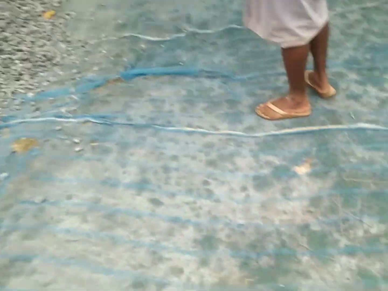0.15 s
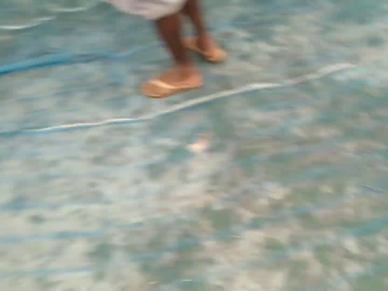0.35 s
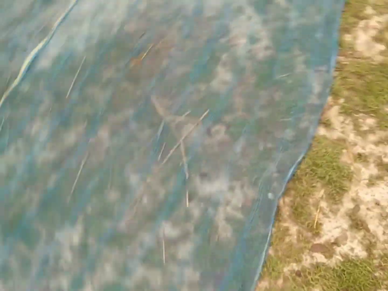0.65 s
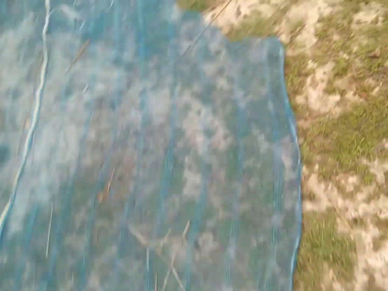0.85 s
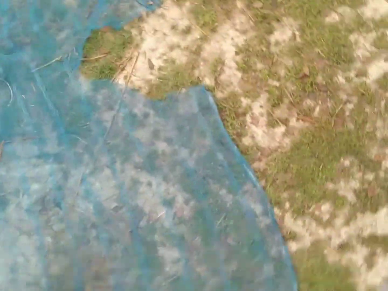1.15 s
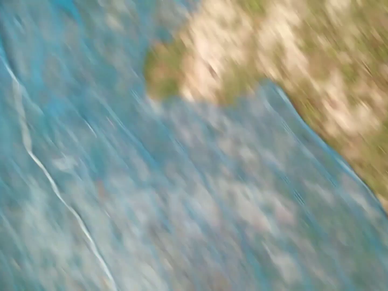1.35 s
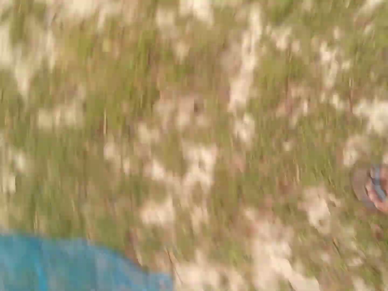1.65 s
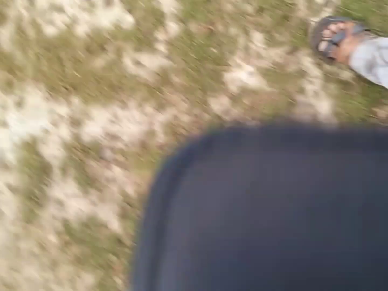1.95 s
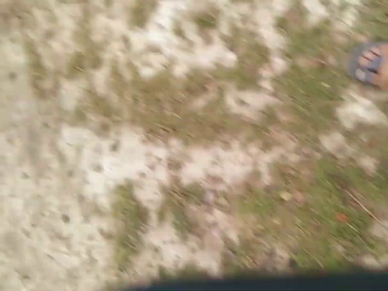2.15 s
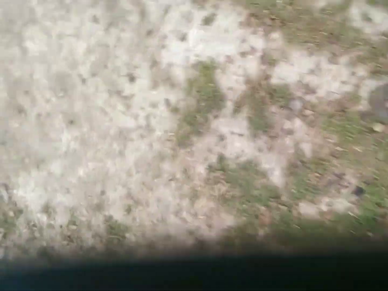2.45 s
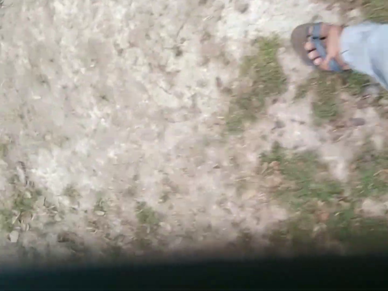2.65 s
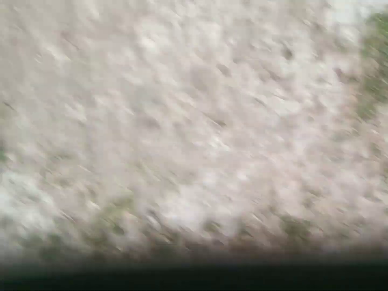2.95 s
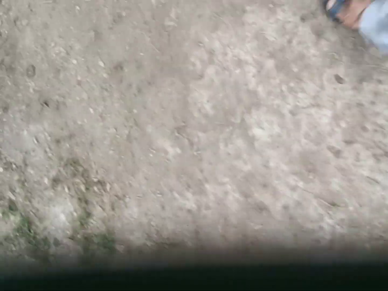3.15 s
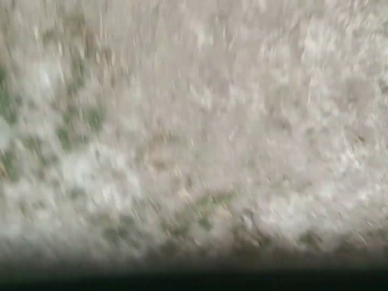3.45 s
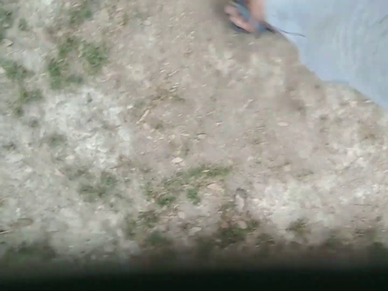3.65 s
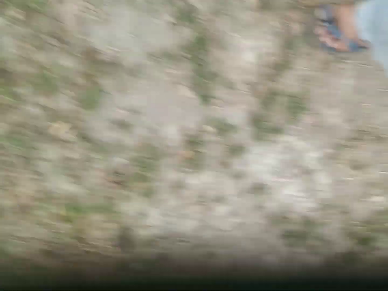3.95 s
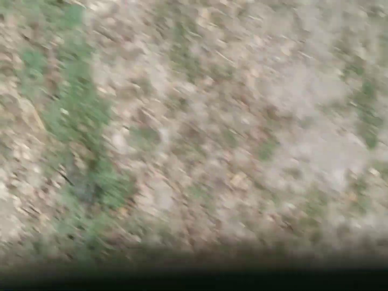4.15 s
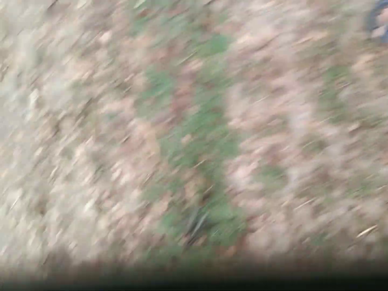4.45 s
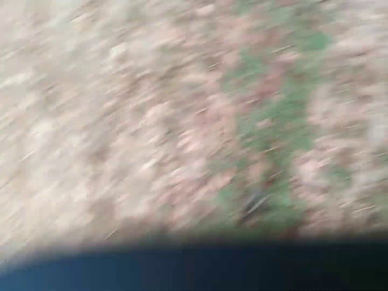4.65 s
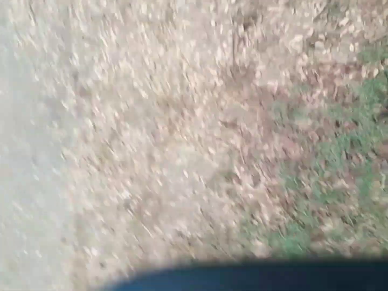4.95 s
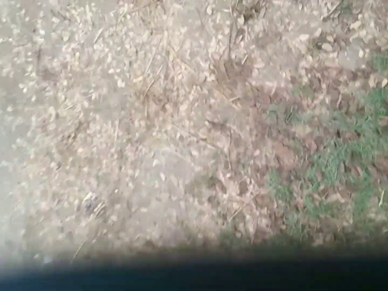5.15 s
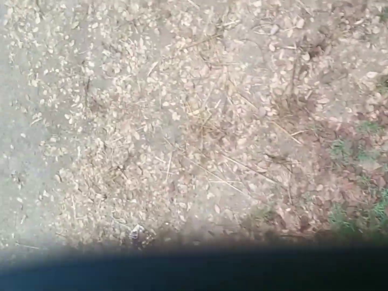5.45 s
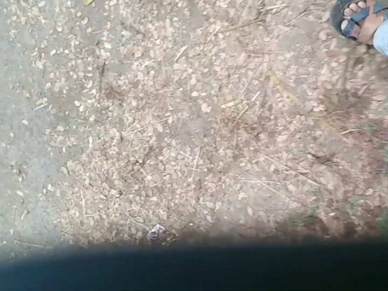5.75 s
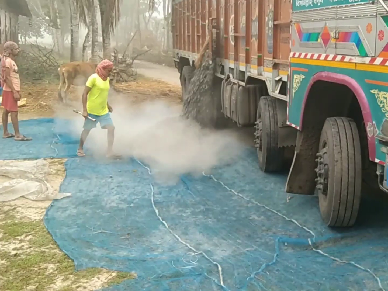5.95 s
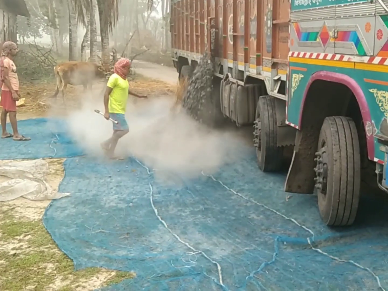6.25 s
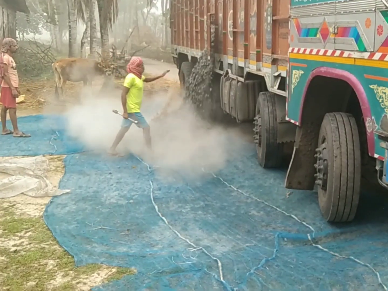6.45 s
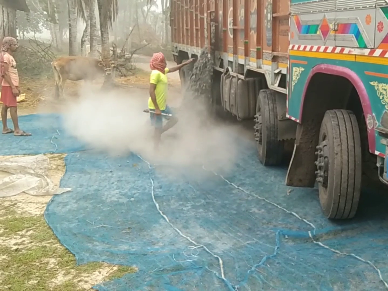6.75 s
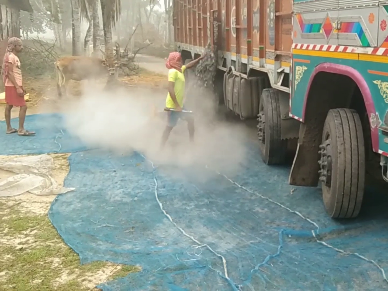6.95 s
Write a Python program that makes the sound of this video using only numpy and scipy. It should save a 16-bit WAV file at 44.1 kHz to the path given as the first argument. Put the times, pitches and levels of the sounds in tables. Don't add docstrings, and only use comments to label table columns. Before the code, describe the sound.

A continuous stony rattle, bright at first, then muffled by the hand and body around a single phone microphone as it is walked past. Sharp ticks, dull knocks, grit crunches, low wind and faint metal creaks overlap it. The rattle brightens again, cuts to a blink of silence, then returns quickly as an even midrange pour with a few knocks and tiny squeaks.

```python
import sys
import numpy as np
from scipy import signal
from scipy.fft import rfft, irfft
from scipy.io import wavfile
from scipy.ndimage import uniform_filter1d, map_coordinates

SR = 44100
rng = np.random.default_rng(int(sys.argv[2]) if len(sys.argv) > 2 else 0)


def natural_amplitude(level_db):
    exponent = np.asarray(level_db, float) / 20
    return 10 ** exponent


def inscribe(sig):
    pcm = np.round(np.clip(np.atleast_2d(sig).T, -1, 1) * 32767)
    wavfile.write(sys.argv[1], SR, pcm.astype(np.int16))


N = 313551
CUT_S, BACK_S = 5.774, 5.856
TOP_HZ = 15520


def unit(x):
    return x / np.sqrt(np.mean(np.abs(x) ** 2) + 1e-20)


def along(points, hz):
    point_hz, value = np.transpose(points)
    return np.interp(np.log(hz + 1), np.log(point_hz + 1), value)


def curves(rows, t):
    start_s, *columns = np.transpose(rows)
    return [np.interp(t, start_s, column) for column in columns]


def wobble(rate, t):
    knots = rng.standard_normal(int(t[-1] * rate) + 4)
    return map_coordinates(knots, [t * rate])


def peak(f, centre_hz, width_hz, boost_db):
    return boost_db / (1 + (2 * (f - centre_hz) / width_hz) ** 2)


def grains(s, hz, life, size, count=96):
    t = np.arange(count) / SR
    age = t / life[:, None]
    shape = size[:, None] * np.sin(2 * np.pi * hz[:, None] * t) * age * np.exp(1 - age)
    at = (s * SR).astype(int)[:, None] + np.arange(count)
    return np.bincount(at.ravel(), shape.ravel(), N + count)[:N]


def burst(s, db, hz, span, spread, count):
    draw = rng.random((count, 3))
    late = span * draw[:, 0] ** 1.5 * (np.arange(count) > 0)
    pitch_hz = hz * np.exp(spread * (2 * draw[:, 1] - 1))
    return s + late, pitch_hz, natural_amplitude(db - 9 * late / span - 1.9 * draw[:, 2])


def bursts(events, trim_db, span, spread, count):
    return np.hstack([burst(s, db + trim_db, hz, span, spread, count) for s, db, hz in events])


def stream(count=40000):
    t = np.arange(N) / SR
    clumps = natural_amplitude(0.22 * wobble(150, t) + 0.94 * wobble(45, t) + 0.53 * wobble(18, t))
    when, pitch, weight = rng.random((count, 3)).T
    hz = 1500 + 13500 * pitch
    size = natural_amplitude(2.3 * weight ** 3) * np.sqrt(hz)
    clicks = unit(grains(when * t[-1], hz, 0.5 / hz, size, count=64))
    return clumps * (clicks + natural_amplitude(5.5) * rng.standard_normal(N))


def carrier_db(f, t):
    # start_s [s], pitch_hz [Hz], boost_db [dB]
    cup = [(0, 577, -14), (.45, 706, -8), (.6, 660, 3), (2.2, 790, 5), (3.6, 1130, 6.5), (3.85, 1300, 3),
           (3.93, 670, 3), (4.1, 696, 13), (4.19, 770, 17), (4.27, 840, 2), (4.5, 800, 8), (4.9, 795, -1),
           (5.05, 604, 4), (5.2, 740, 4.5), (5.77, 790, 7)]
    # start_s [s], pitch_hz [Hz], boost_db [dB]
    case_edge = [(0, 6700, -8.5), (.6, 5840, -5), (.7, 4570, 1), (.92, 4630, 8.5), (1.08, 4400, 7.5),
                 (1.24, 3630, 6), (1.33, 2200, 0), (1.5, 2300, -5), (1.75, 2230, -18), (2.1, 2100, -11),
                 (2.25, 1600, 1), (2.6, 2500, -1), (4.0, 2300, 0.5), (4.5, 2510, -2), (4.68, 3320, -1.5),
                 (4.95, 3500, -6), (5.1, 2070, -0.5), (5.77, 2160, -14)]
    # start_s [s], pitch_hz [Hz], boost_db [dB]
    body = [(0, 7000, -.1), (.62, 7060, -.1), (.72, 6900, -11), (.9, 6500, -4), (.95, 3400, -.1),
            (1.08, 2740, -12), (1.27, 2500, -9), (1.38, 2220, -10), (1.5, 2670, -8), (1.75, 3080, -8),
            (1.93, 3180, -9), (2.05, 3100, -10), (2.2, 3500, -.1), (4.95, 3470, -1), (5.12, 3780, -3),
            (5.35, 4400, -6), (5.5, 4560, -7), (5.77, 4680, -9)]
    cup_hz, cup_db = curves(cup, t)
    edge_hz, edge_db = curves(case_edge, t)
    body_hz, body_db = curves(body, t)
    cup_width_hz = 298 * natural_amplitude(-0.59 * cup_db)
    hand_db = peak(f, cup_hz, cup_width_hz, cup_db) + peak(f, edge_hz, edge_hz / 3.5, edge_db)
    return hand_db + peak(f, body_hz, body_hz / 11, body_db)


def close_echo(f, t, walking):
    # start_s [s], notch_spacing_hz [Hz], strength [0-1]
    hand_echo = [(0, 2320, 0), (.48, 2220, 0), (.7, 3570, 0.2), (.92, 3580, 0.3), (1.08, 2800, 0.28),
                 (1.27, 2380, 0.33), (1.38, 2200, 0.1), (1.5, 2740, 0.18), (1.65, 3200, 0.03),
                 (1.95, 3150, 0.1), (2.2, 4230, 0.02), (3.0, 2130, 0.14), (3.9, 2170, 0.17),
                 (4.3, 1990, 0.05), (4.95, 1750, 0.04), (5.25, 2200, 0.46), (5.45, 2420, 0.3),
                 (5.77, 2400, 0.02)]
    # notch_spacing_hz [Hz], strength [0-1]
    ground_echo = (1450, 0.074)
    spacing_hz, strength = np.where(walking, curves(hand_echo, t), np.c_[list(ground_echo)])
    first_notch_db = peak(f, spacing_hz, 450, -6 * strength)
    strength = np.clip(strength, 0, .95) / (1 + (f / 12000) ** 3)
    return natural_amplitude(first_notch_db) * np.abs(1 - strength * np.exp(2j * np.pi * f / spacing_hz))


def view_levels(t, walking):
    # start_s [s], rumble bending round the carrier level_db [dB], lift of the open view lift_db [dB]
    carry = [(0, -39.5, 22), (.5, -41.5, 21.5), (.65, -36, 15), (.9, -36.5, 16.5), (1.33, -36.5, 6),
             (1.56, -37, 6), (2.05, -33.5, -2.5), (2.3, -35, 10), (2.75, -38.5, 13.5), (2.97, -44, 16),
             (3.45, -42.5, 3), (3.99, -39.5, -3), (4.43, -41, 2), (4.56, -33, 2), (4.8, -36.5, 4.5),
             (4.92, -37.5, 14), (5.2, -34, 10.5), (5.76, -44, 10.5)]
    # start_s [s], lift_db [dB], length_s [s]
    jerks = [(1.106, 1, 0.15), (1.533, 3, 0.21), (2.4, -1, .08), (2.85, -4.5, 0.16), (3.77, 4.5, 0.68),
             (4.28, 6, 0.022), (4.55, 8.5, 0.025), (4.592, 5.5, 0.018), (4.672, 8.5, 0.012),
             (4.73, -2.5, 0.071), (4.91, 4.5, 0.045), (5.065, 2.5, 0.28), (5.346, -1.5, 0.098),
             (5.417, 3.5, 0.09), (5.6, -0.5, 0.064)]
    view_share = [0, .3, 1, 1.15]
    shaded_db = [-0.5, 1, 1, -19]
    stand_db = [-37.5, -32.5, -17, -31.5]
    # start_s [s], level_db [dB]
    cover = [
        (0, 0.5),
        (1.0, 2),
        (1.5, 0),
        (3.5, 1),
        (3.84, 1),
        (3.95, -2.5),
        (4.45, 0),
        (4.55, -7.5),
        (4.8, 5),
        (5.76, 2.5),
    ]
    level_db, view_db = curves(carry, t)
    for s, db, length_s in jerks:
        view_db = view_db + db * np.exp(-(2 * (t - s) / length_s) ** 2)
    walk_db = level_db + np.c_[shaded_db] + np.c_[view_share] * view_db
    heard_db = np.where(walking, walk_db, np.c_[stand_db])
    heard_db[-1] += walking * curves(cover, t)[0]
    return heard_db


def pour():
    # pitch_hz [Hz], level_db [dB per Hz]
    walk_tone = [(88, -53), (150, -37), (263, -7), (472, -5.5), (797, -8.5), (1430, -9), (3420, -5),
                 (5040, 0.5), (7580, 5.5), (8520, 1), (13100, -17.5), (14700, -18.5), (15600, -20)]
    # pitch_hz [Hz], level_db [dB per Hz]
    stand_tone = [(120, -47), (200, -19), (345, -13.5), (770, -15), (1110, -22), (2140, -16), (3250, -11.5),
                  (3800, -10), (5200, -17.5), (6600, -12), (8500, -19), (10300, -24), (12000, -32),
                  (15600, -33)]
    # pitch_hz [Hz], width_hz [Hz], boost_db [dB]
    stand_dips = [
        (530, 240, -16.5),
        (3340, 880, -8.5),
    ]
    edges_hz = [250, 1200, 3500, 9500, 15500]
    hz, t, z = signal.stft(stream(), SR, nperseg=512, noverlap=384)
    usual = np.sqrt(np.mean(np.abs(z) ** 2, axis=1))
    z = z / uniform_filter1d(usual, size=9)[:, None]
    f = hz[:, None]
    walking = t < (CUT_S + BACK_S) / 2
    walk_db = along(walk_tone, f) + carrier_db(f, t)
    stand_db = along(stand_tone, f) + sum(peak(f, *dip) for dip in stand_dips)
    colour = natural_amplitude(np.where(walking, walk_db, stand_db)) * close_echo(f, t, walking)
    shade_db = []
    for lo, hi, db in zip(edges_hz, edges_hz[1:], view_levels(t, walking)):
        band_power = np.sum(colour[(hz >= lo) & (hz < hi)] ** 2, axis=0)
        shade_db.append(db - 10 * np.log10(band_power))
    centres = np.log([600, 2100, 6000, 11500])
    blend = np.array([np.interp(np.log(hz + 1), centres, row) for row in np.eye(4)])
    patches = uniform_filter1d(rng.standard_normal(z.shape), size=7, axis=0)
    patches = uniform_filter1d(patches, size=14, axis=1)
    streaks = uniform_filter1d(rng.standard_normal(z.shape), size=40, axis=1)
    uneven_db = 0.5 * unit(patches) + 1.9 * unit(streaks) / (1 + (f / 6000) ** 2)
    z = z * colour * natural_amplitude(blend.T @ shade_db + uneven_db - 2.0)
    return signal.istft(z, SR, nperseg=512, noverlap=384)[1][:N]


def buffet():
    # start_s [s], level_db [dB]
    gusts = [(0, -56), (.43, -56), (.58, -51), (1.14, -48), (1.49, -50), (1.7, -42.5), (2.23, -44.5),
             (2.58, -52), (3.96, -53.5), (4.5, -43.5), (5.17, -48.5), (5.75, -57.5), (7.1, -51)]
    # pitch_hz [Hz], level_db [dB per Hz]
    wind_tone = [(15, -38), (25, -22.5), (81, -2), (188, -0.5), (236, -5), (265, -12), (300, -17),
                 (390, -77), (660, -120)]
    t = np.arange(N) / SR
    hz = np.fft.rfftfreq(N, 1 / SR)
    noise = irfft(rfft(rng.standard_normal(N)) * natural_amplitude(along(wind_tone, hz)), N)
    return natural_amplitude(curves(gusts, t)[0]) * unit(noise * natural_amplitude(0.55 * wobble(11, t)))


def slides():
    # start_s [s], peak level_db [dB], pitch_hz [Hz],
    # length_s [s]
    runs = [(2.461, -24.5, 1740, 0.14), (0.019, -29.5, 1110, 0.16), (2.495, -19.5, 3100, .3),
            (2.651, -25, 1540, 0.24), (3.751, -29, 1470, 0.31), (4.315, -33, 596, 0.015),
            (4.316, -34, 1050, 0.0097), (4.322, -30, 1780, 0.023), (4.327, -32, 532, .024),
            (4.325, -33, 1400, 0.037), (4.341, -36, 856, 0.054), (4.341, -39, 425, 0.053),
            (4.472, -23, 2130, 0.047), (4.532, -28, 2580, 0.11), (5.062, -10.5, 5440, 0.12),
            (5.075, -29, 700, 0.17), (5.1, -19, 3000, 0.26)]
    out = np.zeros(N)
    for s, db, hz, length_s in runs:
        when, pitch, weight = rng.random((200, 3)).T
        pitch_hz = hz * np.exp(.2 * (2 * pitch - 1))
        size = natural_amplitude(db - 8.5 - 13.3 * weight) * np.sqrt(np.sin(np.pi * when))
        out += grains(s + length_s * when, pitch_hz, 2.2 / pitch_hz, size, count=640)
    return out


def near_chips():
    # start_s [s], peak level_db [dB], pitch_hz [Hz]
    chips = [(0.2484, -2, 8050), (0.3596, -6, 7720), (0.3874, -3, 8040), (.3915, -4, 7300),
             (0.417, -5, 7400), (0.4913, -7, 7750), (0.5887, -5, 7900), (0.6929, -7, 8060),
             (0.7227, -4, 8600), (.7302, -11, 8600), (0.748, -7, 6550), (0.79, -12, 4900),
             (0.8046, -8, 5270), (0.8181, -9, 6100), (0.8296, -0.5, 8700), (.8334, -4, 5000),
             (.8422, -13, 5130), (0.9176, -4.5, 8100), (0.991, -10, 4880), (1.3739, -26, 7100),
             (1.573, -16, 7500), (1.8381, -19, 7700), (1.9371, -19, 7500), (2.2012, -20, 4960),
             (2.5494, -21, 7470), (3.0547, -17, 7400), (3.6081, -25, 5200), (3.7649, -20, 7000),
             (3.7993, -28, 5400), (3.879, -23, 7700), (4.0505, -26, 6500), (4.0981, -23, 6100),
             (4.1252, -31, 4100), (4.2383, -21, 6900), (4.262, -24, 6800), (4.2747, -27, 7300),
             (4.4022, -18, 7540), (4.4639, -27, 4600), (4.48, -19.5, 4570), (4.7037, -21, 7000),
             (4.8634, -10, 7500), (4.9, -7, 7500), (4.907, -4, 6500), (4.913, -8, 6500), (4.9664, -8, 8000),
             (5.014, -7, 7100), (5.029, -7.5, 5400), (5.044, 0, 6300), (5.1074, -11, 6700),
             (5.1287, -10, 7160), (5.4305, -11, 6340), (5.5368, -17, 5700), (6.105, -9, 6810),
             (6.19, -3, 6600), (6.289, -12, 6410), (6.342, -8, 6600)]
    s, hz, size = bursts(chips, -3.0, span=0.0016, spread=0.2, count=3)
    return grains(s, hz, 2.1 / hz, size, count=128)


def bumps():
    # start_s [s], peak level_db [dB], pitch_hz [Hz]
    jolts = [(0.505, -37, 107), (1.049, -41, 97), (1.095, -39, 78), (1.137, -32, 86), (1.175, -36, 89),
             (1.44, -36.5, 95), (1.62, -32, 113), (1.662, -27, 126), (1.7, -34, 98), (1.27, -44, 55),
             (1.64, -31, 58), (3.69, -44, 60), (1.959, -31, 123), (2.265, -37, 66), (2.399, -41, 81),
             (2.559, -39, 102), (2.867, -28, 89), (2.896, -20.5, 106), (2.937, -37, 94), (3.96, -38, 90),
             (4.279, -34, 117), (5.12, -38, 110)]
    settle_s = 0.036
    t, out = np.arange(SR // 5) / SR, np.zeros(N)
    swell = np.exp(-((t - settle_s / 2) / settle_s * 3) ** 2)
    for s, db, hz in jolts:
        turns = hz * t * (1.3 - .3 * np.minimum(t / settle_s, 1))
        out[round(s * SR):][:len(t)] += natural_amplitude(db) * np.sin(2 * np.pi * turns) * swell
    return out


def knocks():
    # start_s [s], peak level_db [dB], pitch_hz [Hz]
    blows = [(.577, -19.5, 2400), (.648, -18.5, 1750), (0.755, -21.5, 1650), (1.476, -26, 970),
             (1.67, -25, 190), (1.97, -25, 200), (2.901, -28.5, 189), (1.838, -29, 1440), (1.954, -27, 930),
             (2.472, -27, 1600), (2.515, -35, 1650), (2.543, -24, 1510), (3.003, -29, 2300),
             (4.096, -29, 1260), (4.27, -29, 2720), (4.319, -19.5, 1210), (0.967, -25, 1790),
             (1.095, -29, 1990), (2.953, -31, 1400), (3.015, -32, 830), (3.127, -37, 1200),
             (3.252, -38, 1900), (3.425, -29.5, 1910), (4.494, -26, 1990), (4.418, -30, 1220),
             (4.594, -24, 1060), (5.042, -24, 670), (5.089, -22.5, 493), (5.488, -26, 720),
             (6.37, -24, 2120), (6.701, -22, 2180), (6.862, -27, 2180)]
    s, hz, size = bursts(blows, -10.5, span=.03, spread=0.5, count=40)
    return grains(s, hz, 1.22 / hz, size * np.sqrt(hz / 900), count=768)


def finger_squeaks():
    # start_s [s], peak level_db [dB], pitch_hz [Hz]
    slips = [(.765, -28, 14300), (.7695, -24, 14100), (.785, -26, 14600), (.804, -27, 14300),
             (.815, -30, 14300), (.822, -15, 14400), (.8317, -26, 14500), (1.023, -31, 15000),
             (1.043, -24, 15000), (1.08, -30, 14200), (1.091, -31, 14700), (1.326, -37, 13800),
             (2.55, -31, 14900), (3.753, -34, 11700), (4.034, -44, 11800), (5.1286, -32, 13300),
             (6.0985, -27, 14900), (6.26, -26, 13700), (6.344, -24, 14800), (6.952, -24, 14800),
             (6.9575, -24, 14500)]
    s, hz, size = bursts(slips, -1.5, span=.003, spread=.03, count=3)
    return grains(s, hz, 9 / hz, size, count=320)


def grit():
    # start_s [s], peak level_db [dB], pitch_hz [Hz]
    crunches = [(1.827, -23, 5000), (2.18, -31, 5800), (3.003, -21, 4020), (3.209, -23, 6300),
                (3.753, -33, 6950), (3.834, -27, 4300), (4.037, -33, 6860), (4.153, -32, 3970),
                (4.222, -35, 6400), (4.289, -29, 5700), (4.453, -25.5, 5700), (4.547, -30, 6440),
                (4.664, -32, 6400), (4.738, -31, 4400), (4.784, -18, 6400), (4.809, -19, 9450),
                (4.843, -17, 6700), (4.859, -21, 6400), (4.89, -15, 7240), (5.292, -20, 5800),
                (5.417, -22, 6140)]
    s, hz, size = bursts(crunches, -8.5, span=0.014, spread=0.53, count=40)
    return grains(s, np.minimum(hz, TOP_HZ), 2.1 / hz, size, count=192)


def steel_bed():
    # start_s [s], pitch_hz [Hz], level_db [dB], t60_s [s]
    modes = [
        (2.68, 1220, -26.5, 0.33),
        (2.72, 1560, -25, 0.16),
        (2.725, 1886, -25, 0.31),
        (2.69, 2246, -43, .12),
        (5.04, 494, -27.5, 0.47),
        (5.18, 10000, -39, .04),
    ]
    t, out = np.arange(N) / SR, np.zeros(N)
    for s, hz, db, t60_s in modes:
        age = np.maximum(t - s, 0)
        swell = 1 - np.exp(-age / 0.027)
        out += natural_amplitude(db - 60 * age / t60_s) * swell * np.sin(2 * np.pi * hz * age)
    return out


def creak():
    # start_s [s], length_s [s], from_hz [Hz], to_hz [Hz], level_db [dB]
    squeals = [(3.53, 0.32, 1283, 1230, -49), (3.65, .1, 1120, 1094, -45), (3.8, .28, 1546, 1520, -43),
               (3.86, .085, 3150, 2930, -49), (3.95, .08, 2890, 2680, -48), (3.901, 0.19, 640, 700, -46.5),
               (4.12, 0.15, 710, 860, -47), (4.398, 0.11, 800, 767, -44), (4.47, 0.18, 780, 805, -40.5),
               (4.64, 0.36, 840, 820, -43), (5.021, 0.18, 720, 635, -40), (5.138, 0.15, 740, 786, -37.5),
               (4.57, .06, 2550, 2470, -36), (4.878, 0.049, 2400, 2420, -36), (5.17, 0.09, 2600, 2560, -37),
               (5.435, 0.088, 870, 872, -38.5)]
    waver, flutter_db = .022, 6
    out = np.zeros(N)
    for s, length_s, from_hz, to_hz, db in squeals:
        part = np.arange(round(length_s * SR)) / (length_s * SR)
        glide_hz = from_hz + (to_hz - from_hz) * part
        hz = glide_hz * (1 + waver * wobble(70, part * length_s))
        swell = natural_amplitude(db + flutter_db * wobble(60.6, part * length_s)) * np.sqrt(np.sin(np.pi * part))
        out[round(s * SR):][:len(part)] += swell * np.sin(2 * np.pi * np.cumsum(hz) / SR)
    return out


def scene():
    mono = pour() + buffet() + slides() + near_chips() + bumps() + knocks()
    mono = mono + finger_squeaks() + grit() + steel_bed() + creak()
    return np.array([mono, mono])


def drop_faint_treble(x):
    # pitch_hz [Hz], level_db [dB per bin]
    faint = [(11500, -112), (12500, -90.5), (14000, -90), (15500, -89)]
    hz, _, z = signal.stft(x, SR, nperseg=2048, noverlap=1536)
    band = (hz // 215).astype(int)
    starts = np.flatnonzero(np.diff(band, prepend=-1))
    power = np.add.reduceat(np.abs(z) ** 2, starts, axis=1) / np.bincount(band)[:, None]
    heard = uniform_filter1d(power, size=3, axis=2)[:, band] > natural_amplitude(2 * along(faint, hz))[:, None]
    kept = (heard | (hz < 11500)[:, None]) * (hz < TOP_HZ)[:, None]
    return signal.istft(z * kept, SR, nperseg=2048, noverlap=1536)[1][:, :N]


def top_cut(x):
    return signal.sosfilt(signal.butter(12, 15700, fs=SR, output="sos"), x)


def record(dry):
    ceiling, fade_s, start_gain = .72, .21, .085
    heard = drop_faint_treble(dry)
    heard = heard / (1 + np.abs(heard / ceiling) ** 6) ** (1 / 6)
    t = np.arange(N) / SR
    walk_out = np.clip((CUT_S - t) / 0.0015, 0, 1)
    steady_in = np.clip(start_gain + (t - BACK_S) / fade_s, 0, 1)
    return top_cut(heard * np.where(t < BACK_S, walk_out, steady_in))


dry = scene()
out = record(dry)
inscribe(out)
```